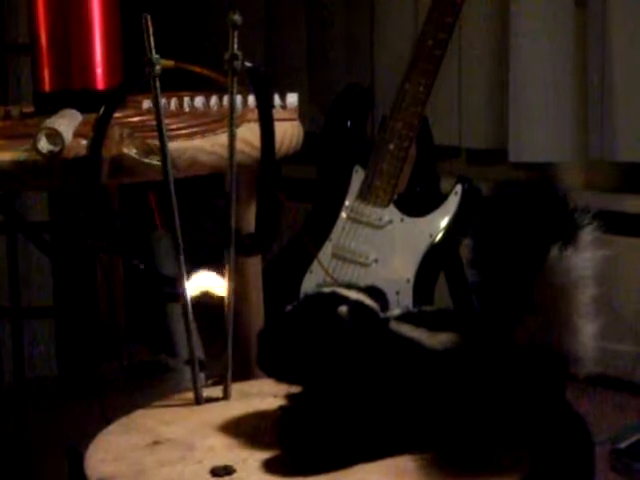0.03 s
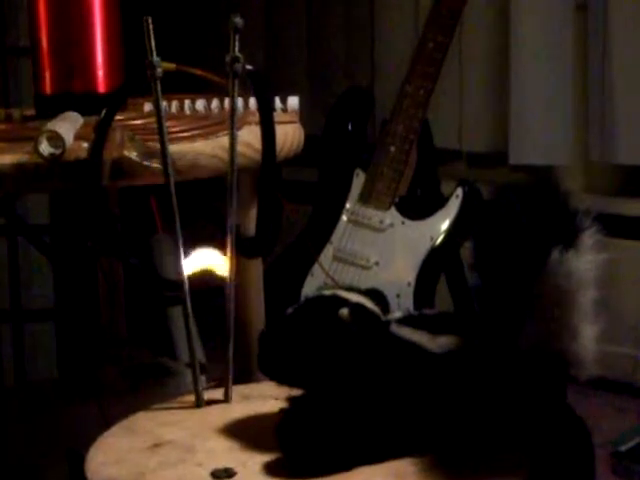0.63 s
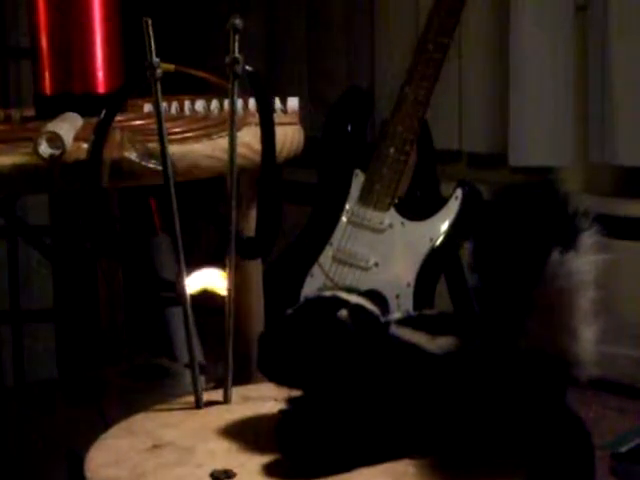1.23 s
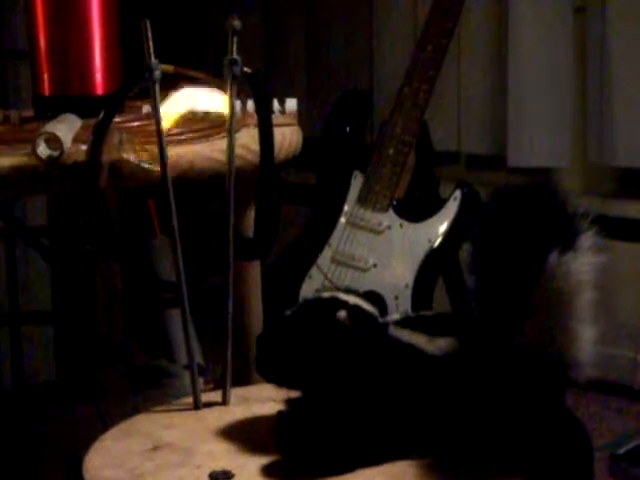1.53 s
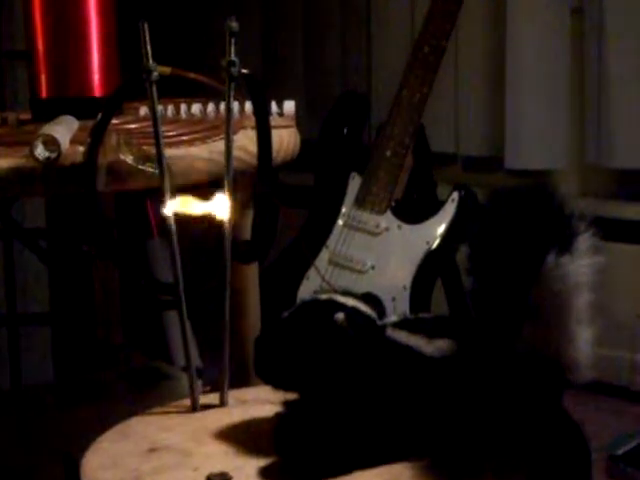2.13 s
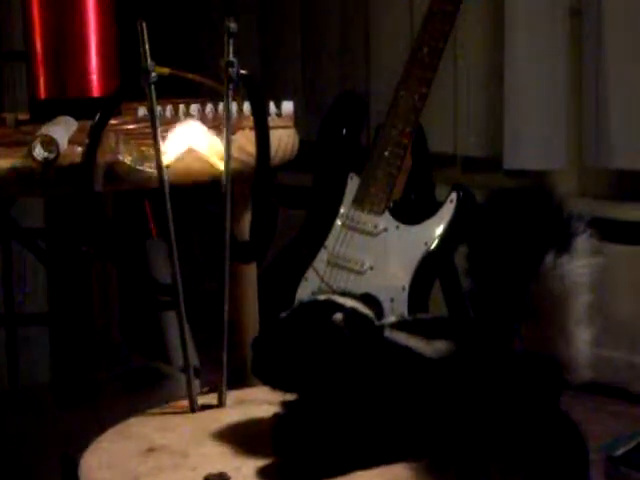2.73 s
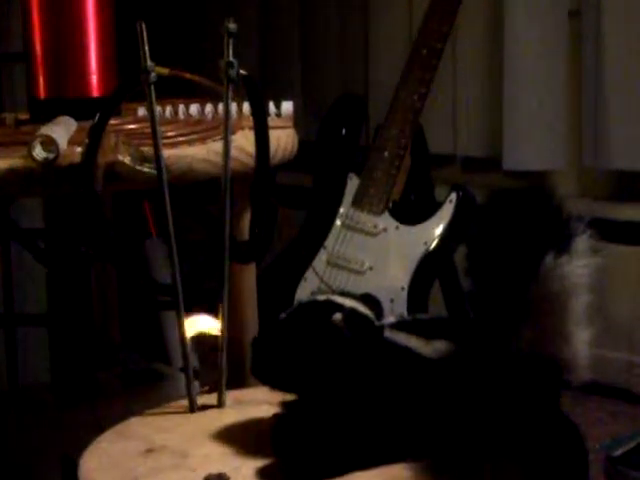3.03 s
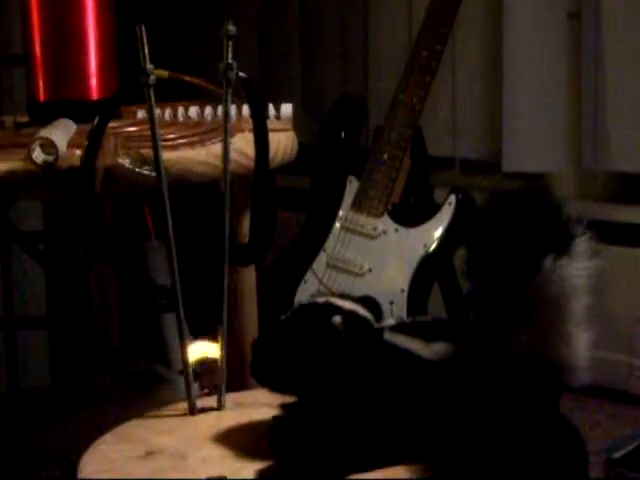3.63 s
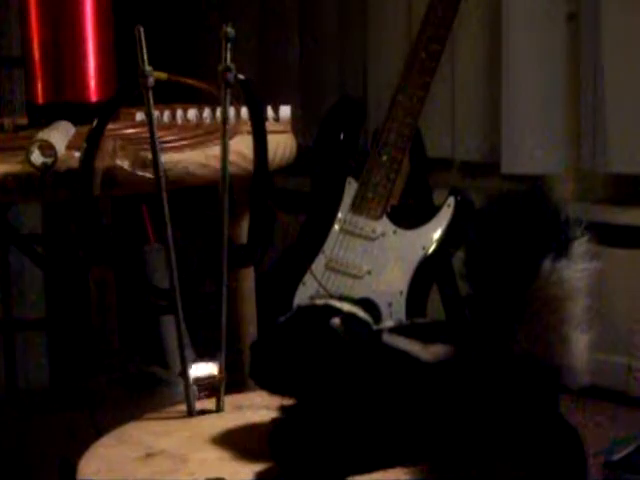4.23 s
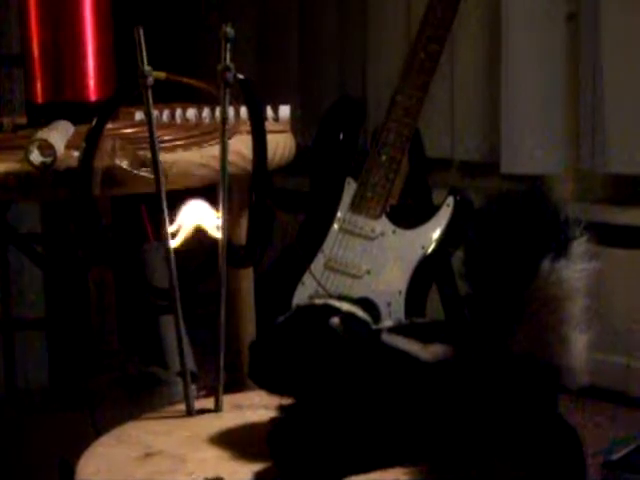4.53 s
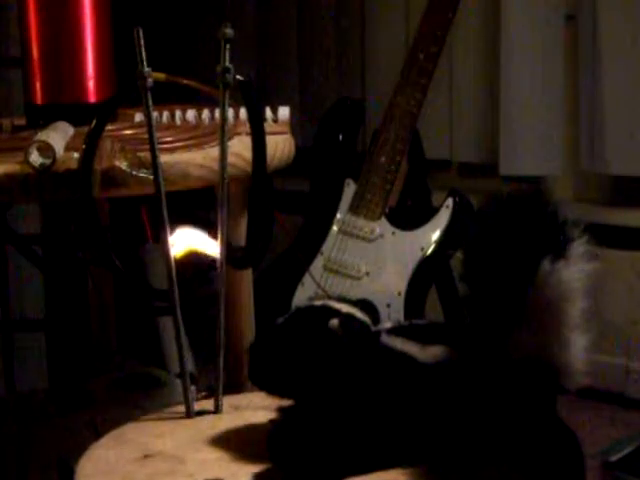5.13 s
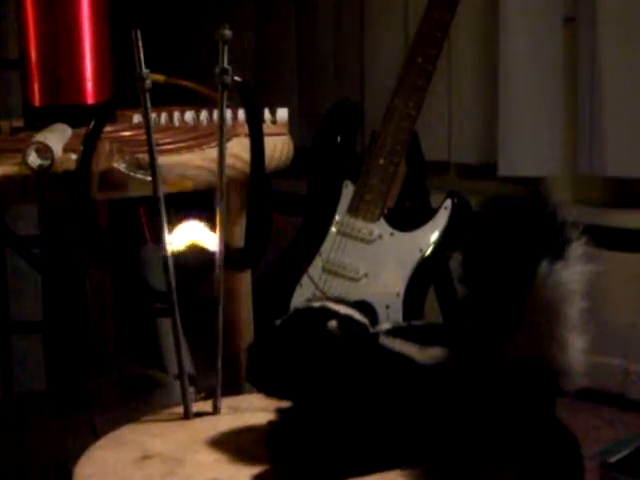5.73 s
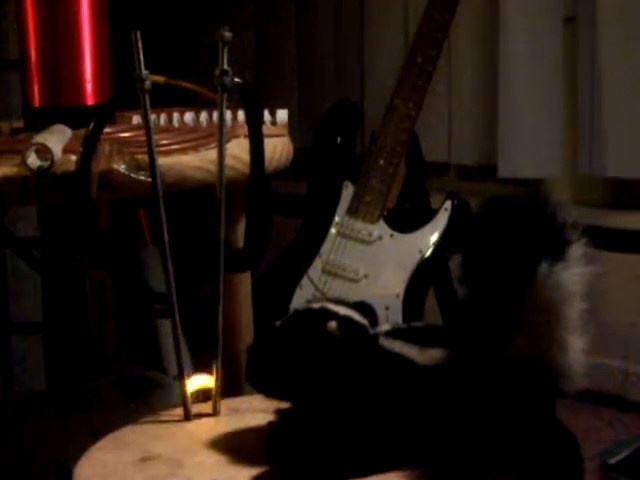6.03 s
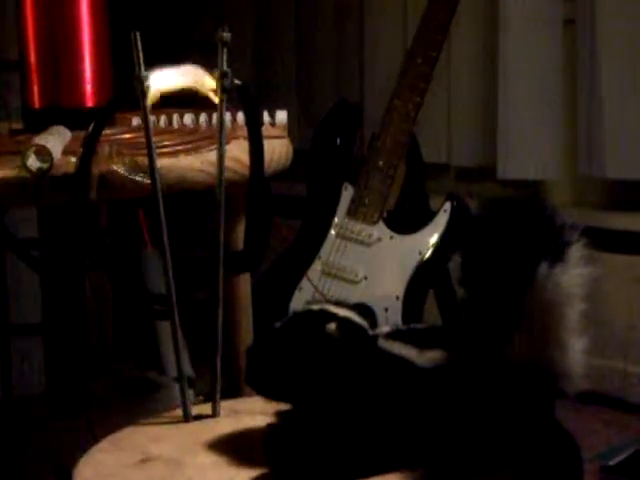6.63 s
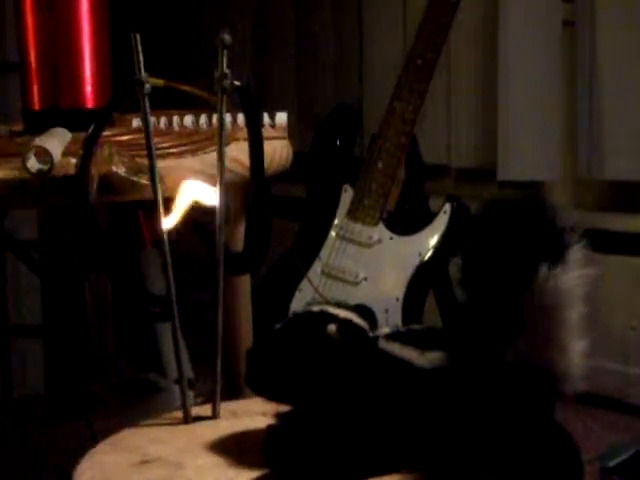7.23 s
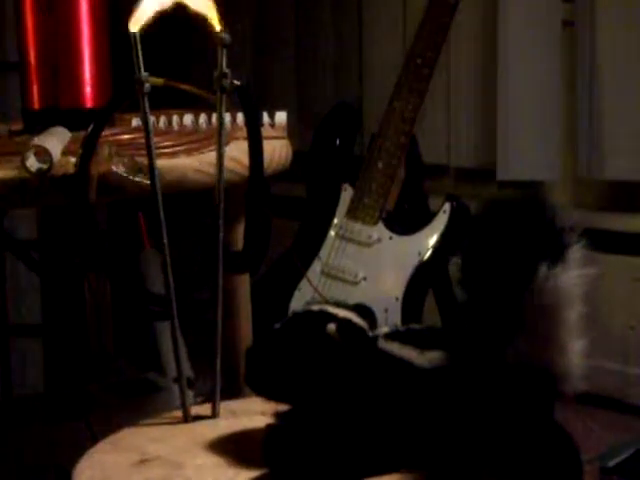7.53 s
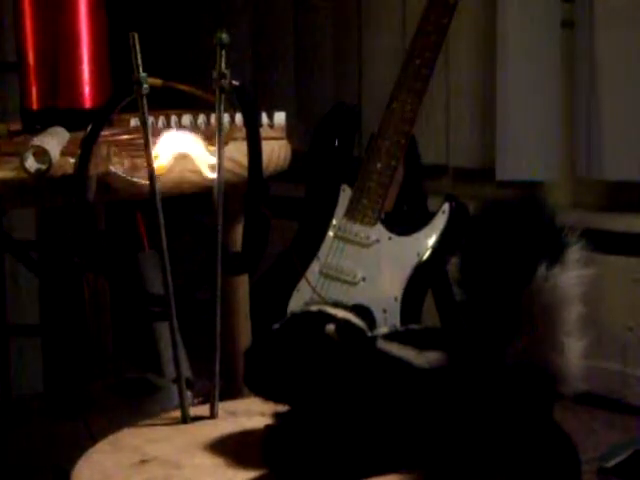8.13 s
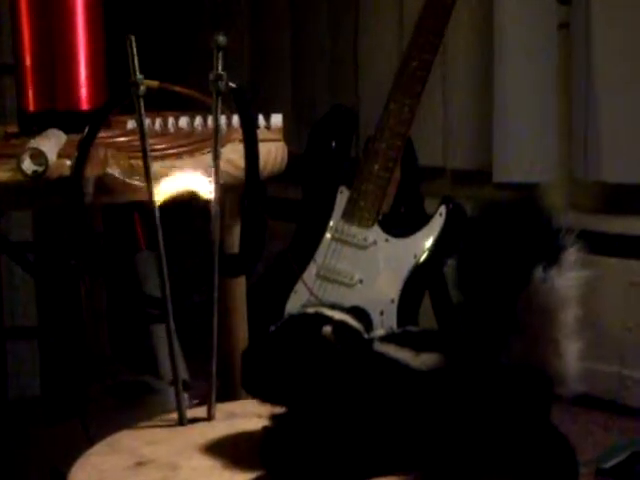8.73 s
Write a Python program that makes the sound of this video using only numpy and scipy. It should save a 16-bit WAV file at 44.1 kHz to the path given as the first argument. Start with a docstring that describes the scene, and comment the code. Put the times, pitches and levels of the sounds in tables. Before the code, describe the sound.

An electric arc climbs between two metal rods with a harsh, crackling buzz and a pulsing hiss. Each climb starts with a sharp snap, sweeps slightly downward in tone, then swells until the arc tears and strikes again. The cycle repeats about every two thirds of a second. Underneath, a transformer hums with soft low bumps and faint knocks. It sounds fairly close, in a small room.

```python
"""An electric arc climbs between two diverging rods, fed by a mains transformer, in a small room.
It relights with a tick every half cycle, louder as it stretches, and hisses once it lifts off the foot.
The board below mirrors it, sweeping a hollow down the treble. At the top the arc tears and strikes
again at the foot with a snap. Underneath, the transformer hums over soft low bumps and faint knocks."""
import sys
import numpy as np
from scipy import signal
from scipy.fft import rfft, irfft
from scipy.io import wavfile

SR = 44100
rng = np.random.default_rng(int(sys.argv[2]) if len(sys.argv) > 2 else 0)


def file_out(sig):
    """Save sig as 16-bit WAV at sys.argv[1]."""
    # one column per channel
    cols = np.atleast_2d(sig).T
    # limit, then scale
    lim = np.clip(cols, -1, 1)
    pcm = np.round(lim * 32767).astype(np.int16)
    wavfile.write(sys.argv[1], SR, pcm)


N = 396459
HALF_CYCLE_HZ = 119.966  # twice the mains frequency


def undb(db):
    """Decibels to gain."""
    return 10 ** (np.asarray(db) / 20)


def unit(x):
    """Scale to rms 1."""
    return x / np.sqrt(np.mean(x ** 2))


def response(points, size=2048):
    """Minimum-phase impulse response of an EQ curve, peak 1."""
    hz, db = np.transpose(points)
    grid = np.maximum(np.arange(size // 2 + 1) * SR / size, 1)
    gain = undb(np.interp(np.log(grid), np.log(hz), db))
    cepstrum = irfft(np.log(gain))
    cepstrum[1:size // 2] *= 2
    cepstrum[size // 2 + 1:] = 0
    h = irfft(np.exp(rfft(cepstrum)))
    return h / np.abs(h).max()


def ring(x, h):
    """Pass a sound through an impulse response."""
    return signal.fftconvolve(x, h)[:N]


def lows(x, hz):
    """Zero-phase low-pass."""
    return signal.sosfiltfilt(signal.butter(3, hz, fs=SR, output="sos"), x)


def impulses(times, sizes):
    """Impulses, each shared between two neighbouring samples."""
    place = np.clip(times * SR, 0, N)
    i, part = place.astype(int), place % 1
    return (np.bincount(i, sizes * (1 - part), N + 2) + np.bincount(i + 1, sizes * part, N + 2))[:N]


def mains_tones(t, partials):
    """Sines locked to the mains, in random phases, levels as rms."""
    return np.sqrt(2) * sum(undb(db) * np.sin(2 * np.pi * (k * HALF_CYCLE_HZ * t + rng.random()))
                            for k, db in partials)


# Dark room tone EQ: (frequency [Hz], gain [dB])
ROOM_TONE_EQ = [(20, 1), (60, 5.5), (100, -3), (170, -2.5), (300, -9), (600, -10.5), (1200, -13.5),
                (4000, -23), (8600, -52.5)]

def room_tone(db=-50):
    """A steady bed of low noise."""
    return undb(db) * unit(ring(rng.standard_normal(N), response(ROOM_TONE_EQ, size=8192)))


# Faint, dull knocks: (time [s], relative level [dB])
KNOCK_CUES = [(0.17, -38), (0.768, -41), (3.261, -44), (4.902, -42), (6.137, -36), (6.258, -39),
              (7.843, -46)]

def knocks(gain_db=3, hz=170, decay_s=0.0065):
    """Each light knock rings for a cycle or two."""
    times, db = np.transpose(KNOCK_CUES)
    age = np.arange(SR // 10) / SR
    body = np.sin(2 * np.pi * hz * age) * np.exp(-age / decay_s)
    return ring(impulses(times, undb(db + gain_db)), body)


# One-second loop of soft low bumps: (time in the loop [s], relative level [dB])
BUMP_LOOP = [(.002, -35.5), (.139, -36), (.265, -35.5), (.399, -35.5), (0.536, -37), (0.639, -36),
             (0.766, -38.5), (0.902, -34.5)]

def bumps(t, gain_db=1, scatter_db=0.7, peak_s=2 * 0.0032, rebound_s=0.022):
    """Each bump is a short dip in pressure with a slow rebound."""
    times, db = np.transpose([(second + s, db) for second in range(int(t[-1]) + 1)
                              for s, db in BUMP_LOOP if second + s > peak_s])
    age = t[:SR // 8]
    attack_s, release_s = 0.0032 * 0.66, 0.0045 * 1.3
    dip = np.exp(-((age - peak_s) / np.where(age < peak_s, attack_s, release_s)) ** 2)
    rebound = 0.17 * (age / rebound_s) ** 2 * np.exp(2 - 2 * age / rebound_s)
    shape = rebound - dip
    sizes = undb(db + gain_db + scatter_db * rng.standard_normal(len(times)))
    return ring(impulses(times - peak_s, sizes), shape / np.abs(shape).max())


# Hum partials: (harmonic of the half-cycle rate, relative level [dB])
HUM_PARTIALS = [(1, -51.5), (2, -53.5), (4, -70), (6, -72)]
# Core whine partials: (harmonic of the half-cycle rate, level [dB])
WHINE_PARTIALS = [(5, -66.5), (18, -63)]

def transformer(t, age, swell_db, foot_db=-6, load_db_per_s=8, swell_share=0.44):
    """The hum grows as the stretching arc draws more power; the core whines steadily."""
    load = undb(foot_db + load_db_per_s * age + swell_share * swell_db)
    return load * mains_tones(t, HUM_PARTIALS) + mains_tones(t, WHINE_PARTIALS)


def room_echoes(x, t, walls_db=-2, t60_s=0.23, bench_db=-9, bench_decay_s=0.0044, dull_hz=7500, spots=9):
    """Bench and walls answer with duller echoes, crossfaded from spot to spot as the arc climbs."""
    starts = np.r_[np.array(ARC_CLIMBS)[:, 0] - 0.5 / HALF_CYCLE_HZ, t[-1] + 1 / SR]
    height = np.interp(t, starts, np.arange(len(starts))) % 1 * (spots - 1)
    lag = t[:SR // 3]
    walls = undb(-60 * lag / t60_s) * (lag > 0.003)
    bench = np.exp(-lag / bench_decay_s) * (lag > 0.0004)
    tail = np.hypot(undb(walls_db) * walls / np.linalg.norm(walls),
                    undb(bench_db) * bench / np.linalg.norm(bench))
    echoes = 0
    for spot in range(spots):
        send = np.sqrt(np.maximum(1 - np.abs(height - spot), 0))
        echoes = echoes + ring(x * send, tail * rng.standard_normal(len(lag)))
    return signal.lfilter(*signal.butter(2, dull_hz, fs=SR), echoes)


def board_bounce(x, t, age, bounce_db=-3, fade_db_per_s=26, lag_at_1s_ms=0.9, sway=0.06, sways_per_s=7):
    """The board mirrors the arc, later and fainter as it climbs: a flange sweeping down the treble."""
    knots = np.arange(0, t[-1] + 1, 1 / sways_per_s)
    writhing = np.exp(sway * np.interp(t, knots, rng.standard_normal(len(knots))))
    lag_s = lag_at_1s_ms / 1000 * age ** 1.53 * writhing
    bounce = undb(bounce_db - fade_db_per_s * age)
    return (x + bounce * np.interp(t - lag_s, t, x)) / np.hypot(1, bounce)


def channel_fader(lift, swell_db, foot_db=-51, lifted_db=-47.5, swell_share=0.35):
    """Gain shared by hiss and drone: it jumps at lift-off and grows a little as the arc stretches."""
    return undb(foot_db + (lifted_db - foot_db) * lift + swell_share * swell_db)


# Drone partials: (harmonic of the half-cycle rate, level before the channel fader [dB])
DRONE_PARTIALS = [(3, -21), (5, -13.5), (15, -11)]

def drone(t, lift, swell_db):
    """Once lifted, the pulsing channel drones along with its hiss."""
    return channel_fader(lift, swell_db) * lift * mains_tones(t, DRONE_PARTIALS)


def rush(age, db=-51, start_hz=5000, end_hz=1600, fall_s=0.18, half_width_hz=600, fade_db_per_s=16):
    """The rising arc rushes in a noise band that sinks and fades as the channel lengthens."""
    centre_hz = end_hz + (start_hz - end_hz) * np.exp(-age / fall_s)
    a, b = signal.lfilter(*signal.butter(2, half_width_hz, fs=SR), rng.standard_normal((2, N)))
    phase = 2 * np.pi * np.cumsum(centre_hz) / SR
    return unit(a * np.cos(phase) + b * np.sin(phase)) * undb(db - fade_db_per_s * age)


# Broad hiss EQ: (frequency [Hz], gain [dB])
HISS_EQ = [(100, -4), (400, -6.5), (750, 1), (1100, -0.5), (1900, 4.5), (3000, 2.5), (4500, 1),
           (6200, -4.5), (7500, 2), (8600, -20)]

def hiss(t, age, lift, swell_db, gain_db=3, depth=0.49, peak_phase=0.33, buzz_db=-12, flicker_db=1):
    """The hot channel hisses in pulses with the current; part of the noise repeats every half cycle."""
    phase = t * HALF_CYCLE_HZ % 1
    size = int(SR / HALF_CYCLE_HZ)
    noise_loop = irfft(np.exp(2j * np.pi * rng.random(size // 2 + 1)), size)
    buzz = np.interp(phase * size, np.arange(size), noise_loop)
    air = unit(ring(rng.standard_normal(N) + undb(buzz_db) * unit(buzz), response(HISS_EQ)))
    current = 1 + depth * np.cos(2 * np.pi * (phase - peak_phase))
    knots = np.arange(0, t[-1], 2 / HALF_CYCLE_HZ)
    flicker = undb(flicker_db * np.interp(t, knots, rng.standard_normal(len(knots))))
    stirred = np.maximum(lift, np.exp(-age / 0.037))  # air stirred by a strike takes a moment to settle
    level = undb(gain_db) * channel_fader(stirred, swell_db)
    return (air * level + rush(age) * lift) * current * flicker


# Bright snap EQ: (frequency [Hz], gain [dB])
SNAP_EQ = [(100, -28), (1200, -27.5), (2400, -7.5), (3700, 2), (5500, -0.5), (7400, 3), (8600, -11.5),
           (10000, -35.5)]

def strike_snaps(gain_db=1, step_ms=0.292, fade_db_per_spark=2, sparks=3):
    """Cold air at the foot breaks down in a quick, uneven volley of sparks, heard as one snap."""
    starts, db = np.transpose([row[:2] for row in ARC_CLIMBS if row[0] > 0])
    gaps = step_ms * rng.uniform(0.49, 1.61, (len(starts), sparks)) / 1000
    times = starts[:, None] + np.cumsum(gaps, axis=1) - gaps[:, :1]
    sizes = undb(gain_db + db[:, None] - fade_db_per_spark * np.arange(sparks))
    return ring(impulses(times.ravel(), sizes.ravel()), response(SNAP_EQ))


# Crisp tick EQ: (frequency [Hz], gain [dB])
TICK_EQ = [(100, -44.5), (600, -19), (1200, -13), (2000, -0.5), (3000, 4.5), (4000, 5.5), (5500, 5),
           (7400, 1), (8600, -14.5), (10000, -46.5)]

def relight_ticks(gain_db=-20.5, foot_delay_ms=6.02, lopsided=0.16, fork_db=-9, fork_ms=1.107):
    """The gap breaks down each half cycle; a long arc ticks earlier, and louder in one polarity."""
    k = np.arange(int(N / SR * HALF_CYCLE_HZ))
    time_draw, level_draw, fork_level_draw, fork_time_draw = rng.standard_normal((len(k), 4)).T
    crossings = k / HALF_CYCLE_HZ
    age, lift, swell_db, _ = climb_at(crossings + foot_delay_ms / 1000)
    delay_ms = foot_delay_ms - 0.69 * age - 0.035 * swell_db
    jitter_ms = 0.03 * (1.5 + 0.095 * swell_db)
    times = crossings + (delay_ms + jitter_ms * time_draw) / 1000
    boost_db = swell_db * (1 + np.where(k % 2, lopsided, -lopsided))
    scatter_db = 0.5 * (2.5 - lift) + 1.23 * lift
    # a fresh strike takes the place of that half cycle's tick
    burning = np.abs(times[:, None] - np.array(ARC_CLIMBS)[:, 0]).min(axis=1) > 0.5 / HALF_CYCLE_HZ
    sizes = burning * undb(gain_db + boost_db + scatter_db * level_draw)
    # the fork is a second breakdown step that fades in around 9 dB of boost
    fork_sizes = sizes * undb(fork_db + 2 * fork_level_draw) / (1 + np.exp((9 - boost_db) / 2))
    fork_times = times + fork_ms * (1 + 0.17 * fork_time_draw) / 1000
    return ring(impulses(times, sizes) + impulses(fork_times, fork_sizes), response(TICK_EQ))


# One row per climb: (strike time [s], relative snap level [dB], lift-off age [s], swell at lift [dB],
# age when stretching starts [s], stretch time [s], added swell [dB], stretched treble tilt [dB])
ARC_CLIMBS = [(-0.13, 0, 0.13, -0.25, 0.44, 0.085, 9.5, 0), (0.4135, -7.5, 0.15, 0, 0.4, 0.056, 8.0, 2.2),
              (1.0637, -5, 0.14, 0.5, 0.49, 0.16, 12, 0.1), (1.7643, -1.5, 0.16, 2.5, 0.47, 0.11, 14, -2),
              (2.3381, 1.5, 0.11, -0.5, 0.47, 0.095, 9, -1.5),
              (2.9309, -3.5, 0.18, -0.2, 0.4, 0.058, 5, 1.5),
              (3.5811, -5, 0.13, -0.7, 0.38, 0.18, 10.1, 3.5),
              (4.2332, -6, 0.17, -0.4, 0.36, 0.24, 8.5, 0.5), (4.8488, -4, 0.15, -1, 0.44, 0.065, 10, -0.5),
              (5.4138, -6.5, 0.18, -1.35, 0.467, 0.1, 12, 3.5),
              (6.0476, -6, 0.15, -0.2, 0.33, 0.85, 19, 2.5),
              (6.8488, -5.5, 0.18, -0.2, 0.46, 0.07, 7.5, 1.2),
              (7.698, -2.5, 0.13, -1.3, 0.38, 0.24, 9.5, -1.5),
              (8.3489, -1.5, 0.14, -0.94, 0.38, 0.31, 10.5, 1)]

def climb_at(t, lift_width_s=0.016):
    """The arc's age [s], lift (0 calm at the foot, 1 carried by rising air), swell and tilt [dB]."""
    rows = np.array(ARC_CLIMBS)
    under_way = np.maximum(np.searchsorted(rows[:, 0], t) - 1, 0)
    start, _, lift_s, lifted_db, stretch_s, length_s, stretched_db, tilt_db = rows[under_way].T
    age = t - start
    lift = 1 / (1 + np.exp((lift_s - age) / lift_width_s))
    stretch = np.clip((age - stretch_s) / length_s, 0, 1)
    return age, lift, lifted_db * lift + stretched_db * stretch, tilt_db * stretch


def climbing_arc(t, age, lift, swell_db, tilt_db, foot_tick_db=-1, foot_low_cut=0.55):
    """Ticks and hiss of the channel; each arc stretches into its own shape, brighter or duller."""
    foot = 1 - lift
    sizzle = relight_ticks() * undb(foot_tick_db * foot) + hiss(t, age, lift, swell_db)
    # the short arc at the foot is too small to radiate much below the treble
    thinned = sizzle - foot_low_cut * foot * lows(sizzle, hz=2500)
    body = lows(thinned, hz=4400)
    treble = thinned - body
    return body * undb(-tilt_db / 2) + treble * undb(tilt_db / 2)


def scene(snap_send_db=-3, foot_send_db=-4):
    """Arc and snaps feed the room, the arc drier at the foot, over a dry bed of tones and low noise."""
    t = np.arange(N) / SR
    age, lift, swell_db, tilt_db = climb_at(t)
    arc = board_bounce(climbing_arc(t, age, lift, swell_db, tilt_db), t, age)
    snaps = strike_snaps()
    echoes = room_echoes(arc * undb(foot_send_db * (1 - lift)) + snaps * undb(snap_send_db), t)
    bed = transformer(t, age, swell_db) + drone(t, lift, swell_db) + bumps(t) + knocks() + room_tone()
    return (arc + snaps + echoes + bed)[None]


def record(dry, ceiling=0.72, notch_hz=4294, notch_q=31, top_hz=8820):
    """Soft clipping rounds the loudest snaps, followed by one narrow notch and a steep top cut."""
    rounded = ceiling * np.tanh(dry / ceiling)
    notched = signal.lfilter(*signal.iirnotch(notch_hz, notch_q, fs=SR), rounded)
    top_cut = signal.firwin(201, top_hz, window=("kaiser", 8), fs=SR)
    return signal.fftconvolve(notched, top_cut[None], mode="same")


dry = scene()
out = record(dry)
file_out(out)
```